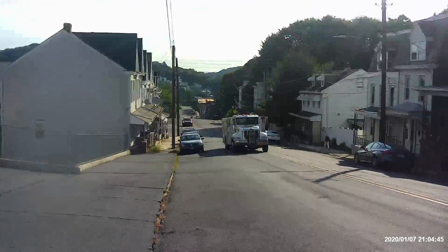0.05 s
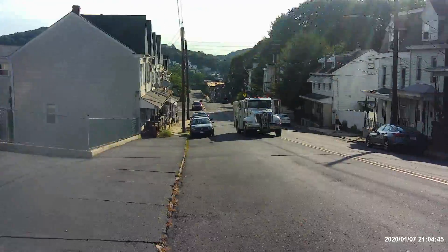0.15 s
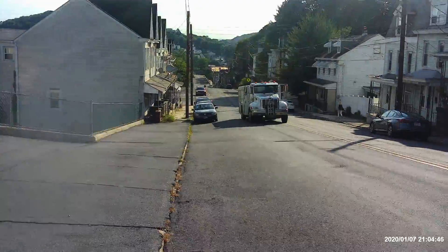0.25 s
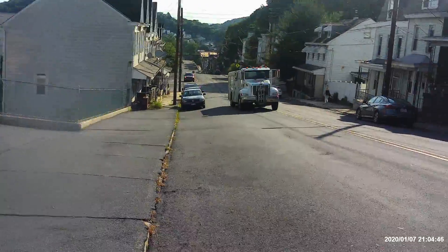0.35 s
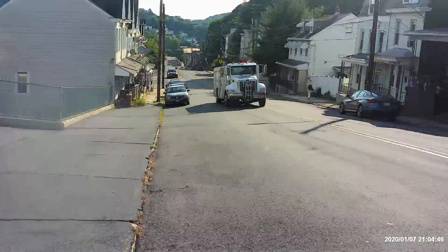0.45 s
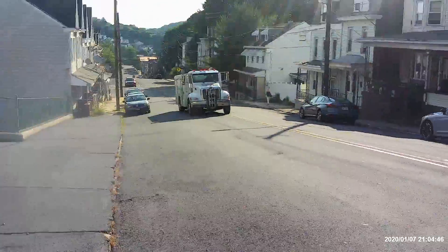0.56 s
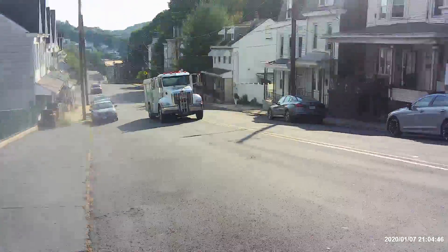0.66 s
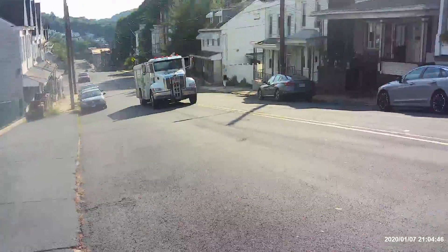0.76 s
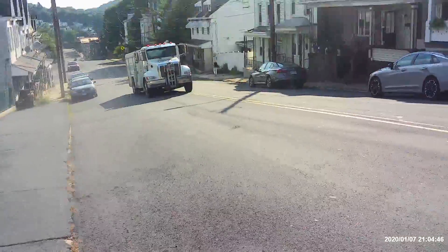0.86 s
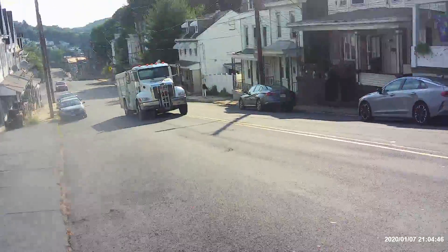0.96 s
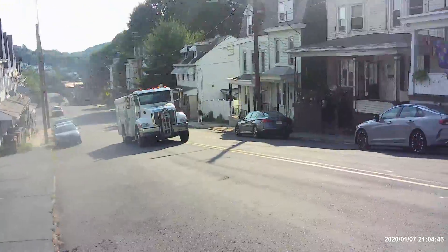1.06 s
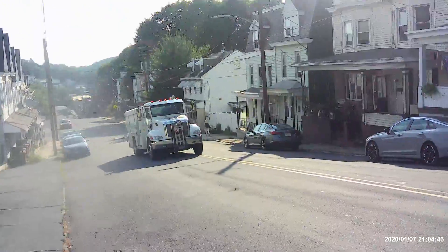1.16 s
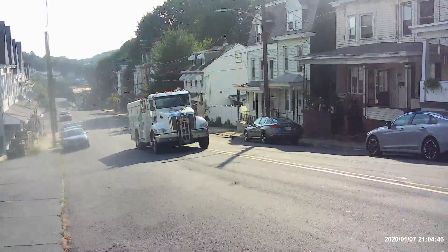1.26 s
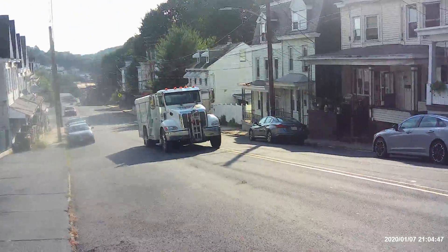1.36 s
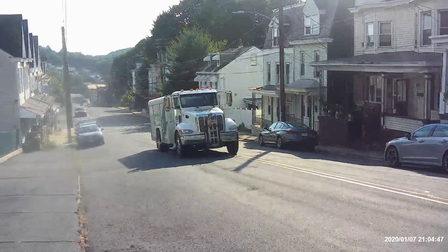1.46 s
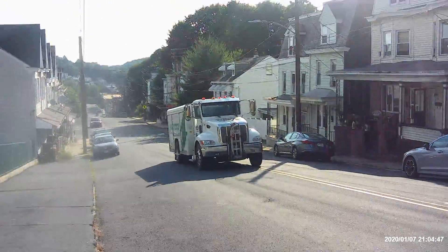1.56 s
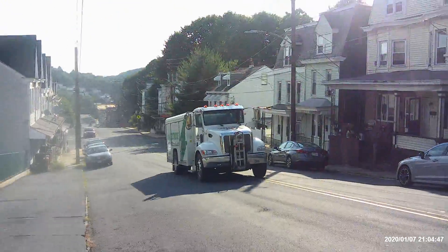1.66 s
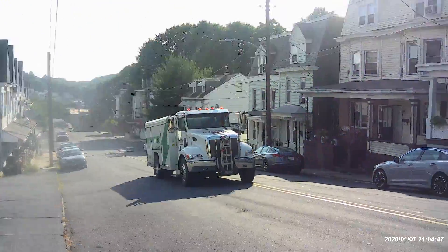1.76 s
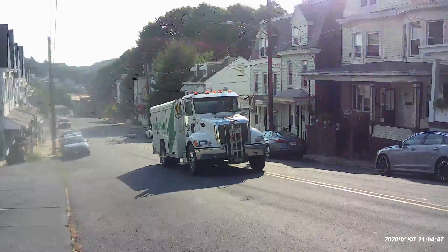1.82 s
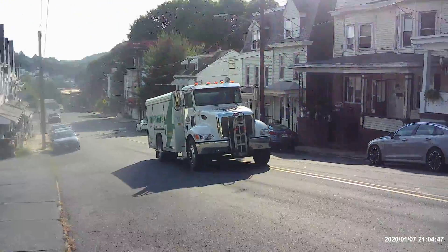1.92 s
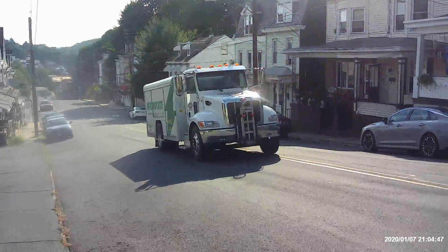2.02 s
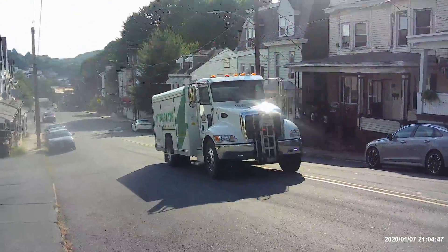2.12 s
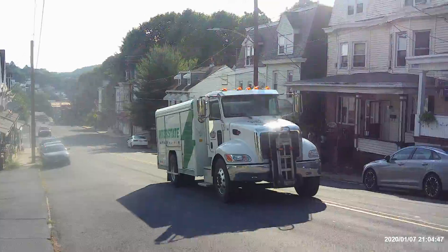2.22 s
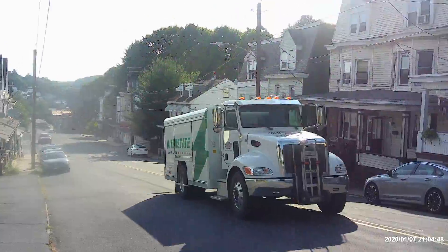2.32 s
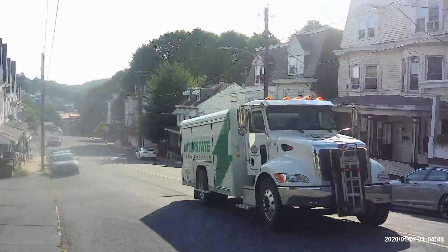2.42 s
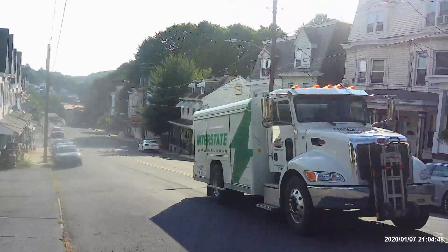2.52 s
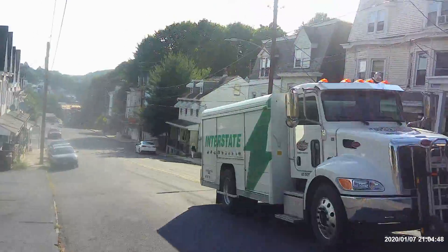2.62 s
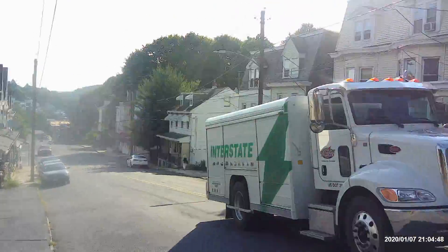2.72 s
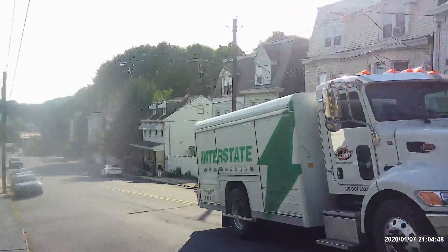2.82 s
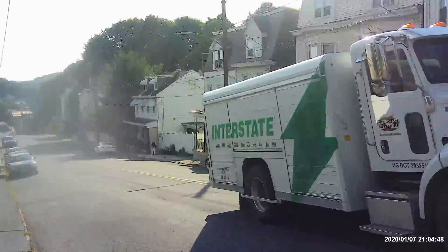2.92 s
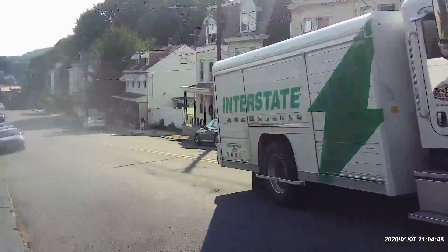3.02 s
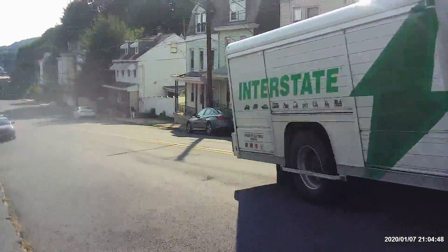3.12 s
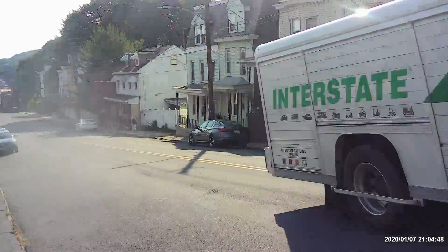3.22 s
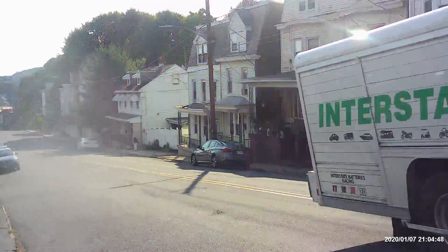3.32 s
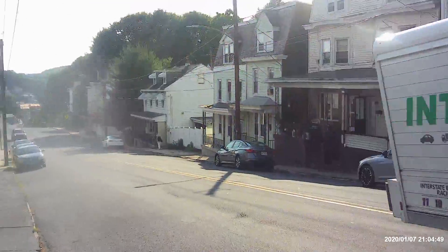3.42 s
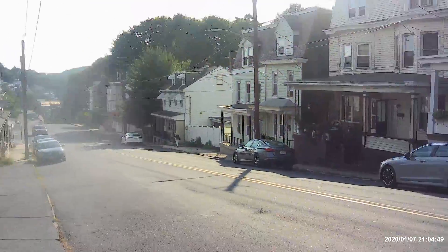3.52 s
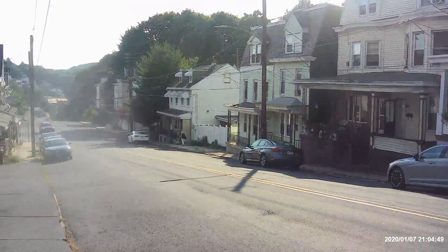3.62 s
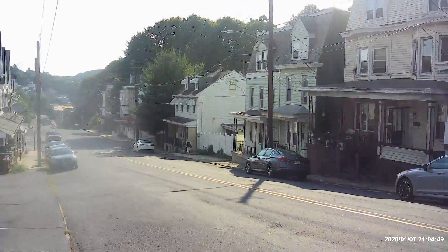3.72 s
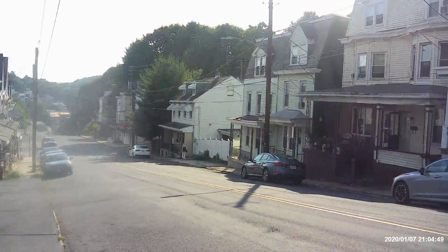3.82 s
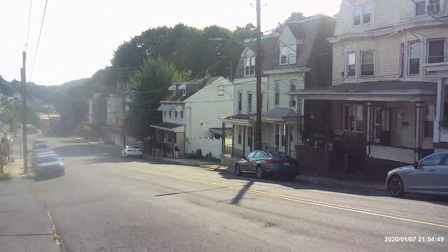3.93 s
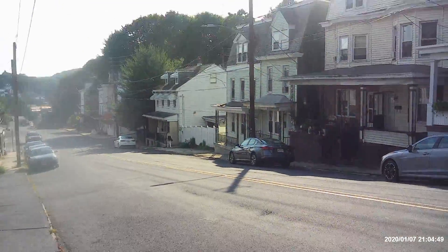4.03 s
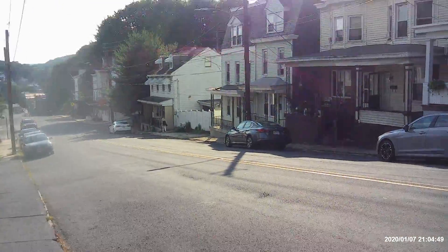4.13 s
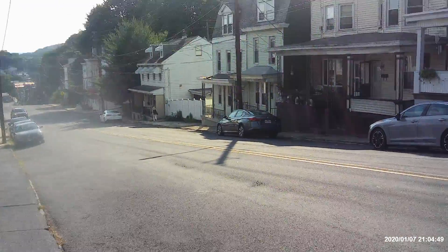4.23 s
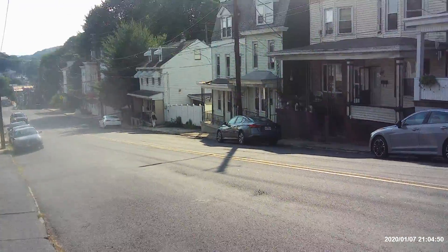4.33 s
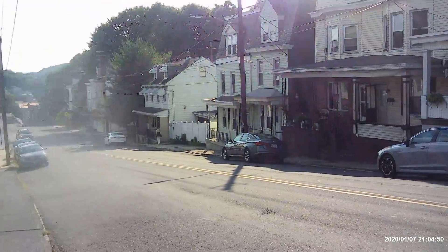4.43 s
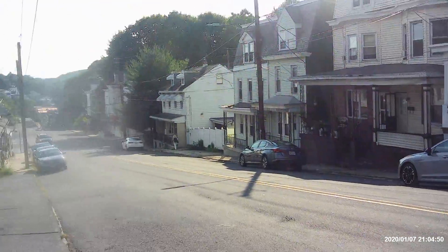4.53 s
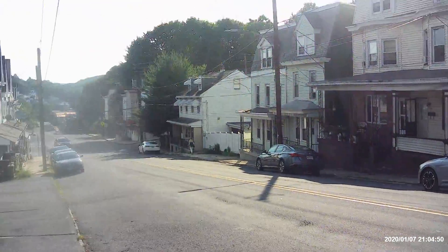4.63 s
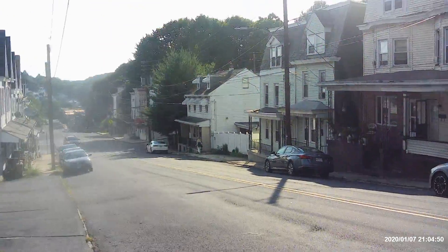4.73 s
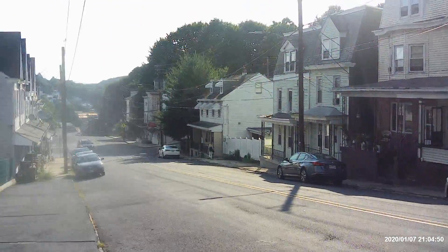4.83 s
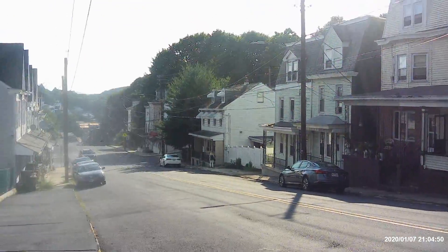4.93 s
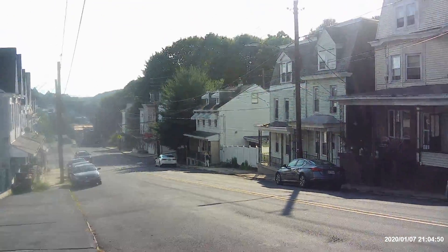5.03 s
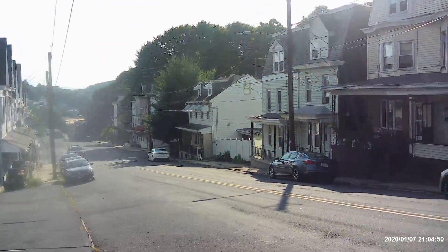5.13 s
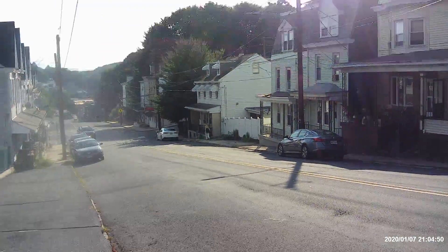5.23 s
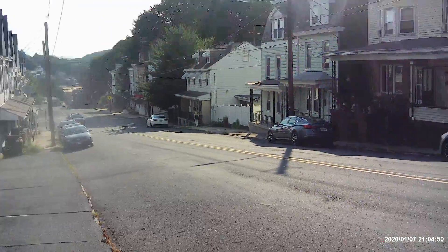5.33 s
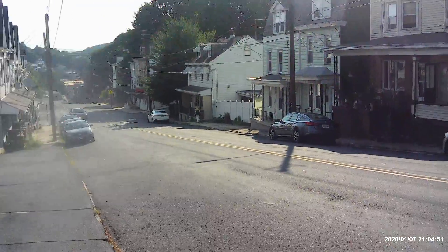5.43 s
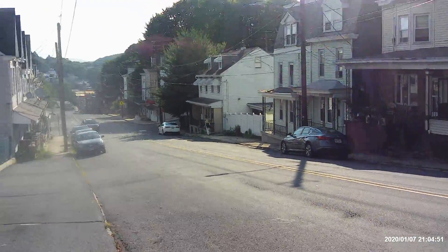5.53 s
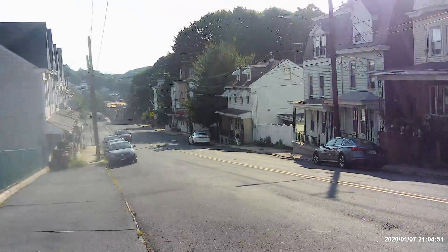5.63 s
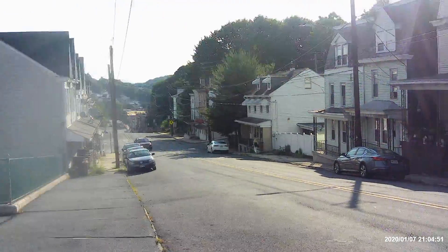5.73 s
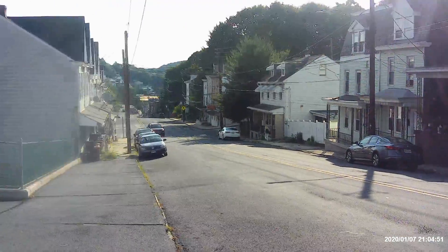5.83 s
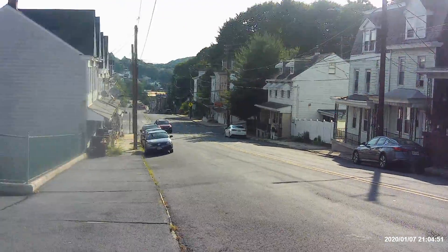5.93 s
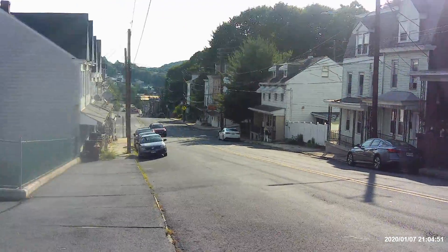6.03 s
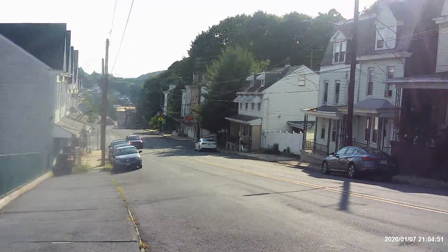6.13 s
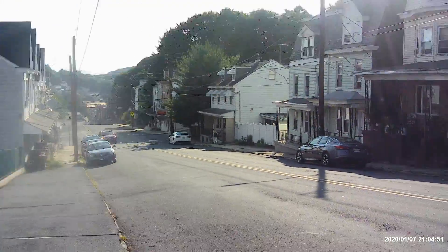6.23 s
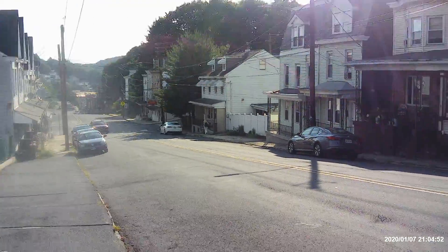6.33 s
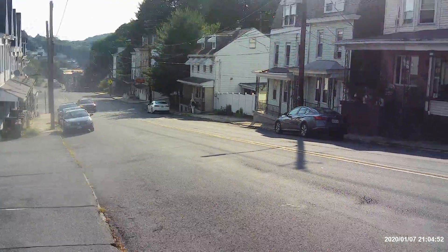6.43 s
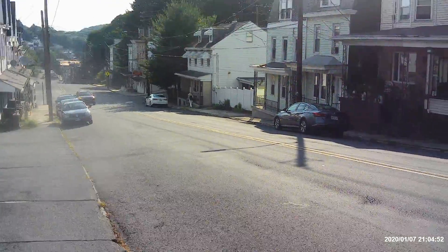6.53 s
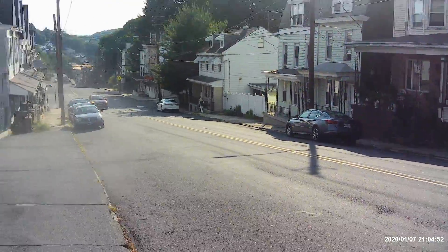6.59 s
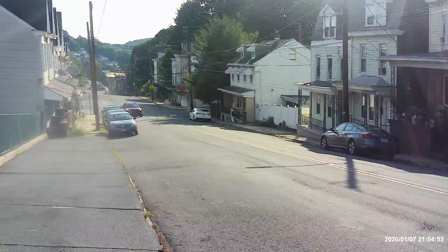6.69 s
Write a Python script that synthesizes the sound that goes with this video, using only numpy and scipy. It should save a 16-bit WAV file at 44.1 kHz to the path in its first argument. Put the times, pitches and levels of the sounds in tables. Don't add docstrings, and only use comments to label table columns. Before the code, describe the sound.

A roadside microphone on a residential street hears one heavy six-cylinder diesel truck. From 0 to 1.5 seconds it is at moderate distance: a buzzing low drone with soft broadband roar and mid-range clatter, its tones swelling and dipping as echoes off house fronts interfere. A faint, fuzzy gear whine flickers through. From 1.5 to 3 seconds it grows steadily, engine notes stronger and more nasal, clatter brightest around 3.1. Between 3.3 and 4 it passes: tyre and exhaust roar peaks near 3.8, with a short thump-like surge at 3.7, while the pitch slides down slightly. A very high, thin turbo whistle appears in bursts, most sustained from 3.3 to 4.5. Another small wheel bump comes at 4.2. Then clatter drops behind a duller tail rumble, which fades quickly by 5 seconds and dwindles to a faint, wavering hum by 6.8. Treble is thin and patchy.

```python
import sys
import numpy as np
from scipy import signal
from scipy.io import wavfile
from scipy.ndimage import uniform_filter1d

SR = 44100
rng = np.random.default_rng(int(sys.argv[2]) if len(sys.argv) > 2 else 0)


def to_wav(s):
    ch = np.atleast_2d(s).T
    pcm = np.round(np.clip(ch, -1, 1) * 32767)
    wavfile.write(sys.argv[1], SR, pcm.astype(np.int16))


def natural_amplitude(level_db):
    exponent = np.asarray(level_db, float) / 20
    return 10 ** exponent


N = 298116


def evened(x):
    return x / np.sqrt(np.mean(x ** 2) + 1e-20)


def bump(t, centre_s, width_s):
    return np.exp(-.5 * ((t - centre_s) / width_s) ** 2)


def drift(per_s):
    steps = int(N / SR * per_s) + 3
    z = rng.standard_normal((steps, 2)) @ [1, 1j]
    smooth = signal.resample(z, 50 * steps)
    return smooth[(np.arange(N) / SR * per_s * 50).astype(int)] / np.sqrt(2)


def blend(values, facing):
    return sum(np.maximum(1 - abs(facing - k), 0) * v for k, v in enumerate(values))


def doppler(t, abreast_s, glide_s, share):
    return 1 - share * (t - abreast_s) / np.hypot(t - abreast_s, glide_s)


# time in seconds, roar level in dB, facing side (0 far ahead, 1 near ahead, 2 flank, 3 tail).
PASSING = [(0.0, -33.5, 0.5), (.55, -32, 0), (1.0, -30, 0.3), (1.5, -29, 1.03), (2.05, -26.5, 1.15),
           (2.45, -24, 0.84), (2.85, -24, 1), (3.15, -22.5, 1.04), (3.55, -19, 1.57), (3.8, -17.5, 2),
           (3.97, -20.5, 2.5), (4.25, -24.5, 3), (4.6, -28.5, 6), (5.0, -31.5, 5), (6.4, -39, 3),
           (6.76, -42, 3)]


def passing(t):
    s, near_db, facing = np.transpose(PASSING)
    return np.interp(t, s, near_db), np.clip(np.interp(t, s, facing), 0, 3)


def body_screening(t):
    nose, shade = (3.1, .27, 4.5, 2, 1), (3.92, .3, -4.5, -2, -1)
    return sum(bump(t, s, width) * np.array(db)[:, None] for s, width, *db in (nose, shade))


# time in seconds, extra roar in dB, extra clatter in dB.
SEAMS = [
    (3.67, 3.5, 2),
    (3.8, 0.5, -2),
    (4.2, 2.5, 1.5),
    (4.245, 0.5, 0.5),
]


def seam_surges(t):
    return sum(bump(t, s, .022) * np.array(db)[:, None] for s, *db in SEAMS)


def engine_cycle(t):
    cycle_hz = 16.669 + .507 * t
    return np.cumsum(cycle_hz * doppler(t, abreast_s=3.49, glide_s=.786, share=.046)) / SR


def echoed(dips, t):
    s, echo, top_db = np.transpose(dips)
    ends = np.append(s, 2 * s[-1] - s[-2])
    slip = np.interp(t, ends, np.arange(len(ends)))
    echo = np.clip(np.interp(t, s, echo), 0, 1)
    swell = natural_amplitude(np.interp(t, (ends[1:] + s) / 2, top_db))
    interference = abs(1 - echo * np.exp(2j * np.pi * slip)) / (1 + echo)
    return swell * interference ** .9


# time of the dip in seconds, echo share 0-1, top of the next swell in dB.
ORDER_6_DIPS = [(-.2, .5, -29), (1.17, .9, -30), (2.05, .5, -30), (2.42, .3, -31.5), (2.88, .45, -34),
                (3.07, .35, -28.5), (3.56, .5, -29), (4.25, .15, -32.5), (4.62, .35, -38.5),
                (4.88, .5, -37), (5.6, .9, -43.5), (6.04, .35, -46), (6.57, .8, -57.5)]
ORDER_9_DIPS = [(-.2, .5, -54), (1.0, .5, -46), (1.77, .6, -40), (2.62, .8, -43), (3.11, .5, -31),
                (3.71, .6, -30.5), (4.02, .25, -39), (4.44, .45, -41), (4.8, .15, -38), (5.39, .5, -41),
                (6.05, .3, -45), (6.27, .5, -42), (6.65, .3, -50)]
ORDER_12_DIPS = [(-.2, .3, -44), (.84, .5, -36), (1.52, 1, -37.5), (2.1, .6, -30.5), (2.65, 0.28, -30.5),
                 (3.05, 0.33, -29), (3.37, 0.27, -25), (3.67, .8, -30.5), (4.2, 0.55, -37), (4.9, .9, -45),
                 (5.41, .8, -43.5), (5.78, .6, -48.5), (6.44, .9, -50)]
ORDER_15_DIPS = [(-.3, .2, -34), (.61, .6, -30), (1.15, .4, -28), (1.53, .8, -42), (1.69, .8, -31.5),
                 (2.03, .6, -31.5), (2.3, .3, -31), (2.63, .4, -25), (2.9, .1, -23.5), (3.45, .5, -33),
                 (3.71, .7, -36), (4.11, .8, -42), (4.55, .5, -45), (5.08, .6, -46), (5.7, .8, -47),
                 (6.4, .8, -51)]
# order of the cycle, levels in dB over the roar from far ahead, near ahead, flank and tail.
WEAK_ORDERS = [(3, -39, -42, -48, -37), (4, -29, -30, -34, -27), (5, -29, -30, -32, -24),
               (7, -22, -22, -22, -20), (8, -18, -20, -22, -22), (10, -22, -22, -20, -18),
               (11, -12, -10, -16, -16), (13, -15, -14, -17, -17), (14, -16, -8, -14, -17),
               (16, -12, -11, -16, -19), (17, -12, -16, -18, -18), (18, -16, -13, -14, -20),
               (19, -16, -18, -20, -20), (20, -14, -13, -14, -16), (21, -18, -16, -16, -18),
               (22, -16, -9, -18, -22), (24, -9, -10, -14, -18), (26, -5, -5, -14, -26),
               (27, -20, -14, -22, -26), (39, -10, -20, -30, -30), (41, -14, -22, -30, -30),
               (42, -9, -20, -30, -30), (45, -17, -26, -34, -34), (48, -17, -26, -34, -34)]


def engine(t, roar_db, facing, cycle):
    out = np.zeros(N)
    strong = {6: ORDER_6_DIPS, 9: ORDER_9_DIPS, 12: ORDER_12_DIPS, 15: ORDER_15_DIPS}
    for order, dips in strong.items():
        wander = np.exp(.045j * order * drift(per_s=6).real)
        tone = (wander * np.exp(2j * np.pi * order * cycle)).real
        out += np.sqrt(2) * echoed(dips, t) * tone
    for order, *side_db in WEAK_ORDERS:
        fading = .7 + .7 * drift(per_s=3 + order / 3)
        turn = np.exp(2j * np.pi * (order * cycle + 0.28 * rng.standard_normal()))
        out += natural_amplitude(roar_db + 1.0 + blend(side_db, facing)) * (fading * turn).real
    return out


def read(points, hz):
    f, db = np.transpose(points)
    return np.interp(np.log(hz + 1), np.log(f + 1), db, left=-200, right=-200)


def rush(colours, level_db, facing, patchy_db, size=1024):
    hop = size // 4
    frames, hz = N // hop + 5, np.fft.rfftfreq(size, 1 / SR)
    a, b, patches = rng.standard_normal((3, len(hz), frames))
    patches = uniform_filter1d(patches, size=6, axis=0)
    patches = evened(uniform_filter1d(patches, size=16, axis=1))
    side = facing[np.minimum(np.arange(frames) * hop, N - 1)]
    shape = natural_amplitude(blend([read(c, hz)[:, None] for c in colours], side))
    shape = shape / np.sqrt((shape ** 2).mean(0))
    z = (a + 1j * b) * shape * natural_amplitude(patchy_db * patches)
    noise = signal.istft(z, nperseg=size, noverlap=size - hop)[1][:N]
    return natural_amplitude(level_db) * evened(noise)


def knock(cycle, depth):
    firing = 6 * cycle
    strength = 1 + .5 * rng.standard_normal(6)[firing.astype(int) % 6]
    return evened(1 + depth * strength * np.sin(np.pi * firing) ** 2)


# frequency in Hz, level in dB per Hz.
ROAR_COLOURS = [
    [(35, -59), (60, -40), (95, -24), (140, -11), (330, -8.5), (460, -7.5), (600, -12.5), (760, -7), (950, -7.5), (1200, -27), (1560, -38), (2640, -120)],
    [(35, -63.5), (60, -43.5), (95, -12), (140, -12), (330, -7.5), (470, -2), (620, -6), (800, -5), (950, -6), (1200, -22.5), (1560, -39.5), (2640, -120)],
    [(35, -64), (60, -31), (102, -33), (134, -9.5), (158, -23), (263, -8), (365, -7.5), (700, -0.5), (1200, -28), (1560, -50), (2640, -120)],
    [(35, -60), (60, -29), (95, -18), (140, -10.5), (300, -7.5), (500, -3), (680, 1), (880, -4), (1060, -26.5), (1200, -25), (1560, -51), (2640, -120)],
]


def roar(roar_db, facing, cycle):
    return rush(ROAR_COLOURS, roar_db, facing, patchy_db=0.32, size=2048) * knock(cycle, depth=0.23)


# frequency in Hz, level in dB per Hz.
CLATTER_COLOURS = [
    [(620, -30), (1050, -4), (1120, -9), (1220, -3), (1320, 4), (1430, -1.5), (1690, 2), (2010, -6.5), (2620, 0), (3160, -15.5), (3570, -11.5), (4600, -22.5), (5980, -51.5), (10100, -120)],
    [(620, -16.5), (1050, -5.5), (1170, -3.5), (1500, 1.5), (1700, 2), (1940, -6.5), (2050, -7.5), (2370, -5.5), (2650, -4.5), (3140, -10), (4020, -14), (4600, -23.5), (5980, -53), (10100, -120)],
    [(620, -27), (1050, -9.5), (1300, -8), (1750, 3.5), (2150, -5.5), (2570, -1), (3020, -10.5), (3420, -3.5), (3940, -10), (4600, -29), (5980, -59), (10100, -120)],
    [(620, -43), (1050, -16.5), (1290, -2), (1650, -0.5), (1850, -3), (2140, -15.5), (2390, -9), (2590, -8), (2930, -14), (3320, -13.5), (3870, -14.5), (4320, -24.5), (4600, -47), (5980, -53), (10100, -120)],
]


def clatter(clatter_db, facing, cycle):
    return rush(CLATTER_COLOURS, clatter_db, facing, patchy_db=0.64) * knock(cycle, depth=0.073)


# frequency in Hz, level in dB per Hz.
HISS_COLOURS = [
    [(2590, -32), (4400, 0.5), (4770, -2), (5420, -4.5), (5850, -10.5), (6510, -6), (7300, -14.5), (7960, -10), (8400, -19.5), (10900, -42), (18500, -120)],
    [(2590, -28), (4400, -7), (4880, -0.5), (5800, -10), (6020, -10), (6570, -4), (7260, -12), (7910, -6.5), (8400, -15), (10900, -41), (18500, -120)],
    [(2590, -27), (4400, -2), (4940, -2.5), (6640, 5), (7360, -6.5), (7960, -4.5), (8400, -10.5), (10900, -36), (18500, -120)],
    [(2590, -17), (4400, -0.5), (4660, 2.5), (5110, -3), (5430, -0.5), (5960, 0.5), (7300, -7.5), (7870, -6.5), (8400, -17.5), (10900, -39), (18500, -120)],
]
# frequency in Hz, level in dB per Hz.
TOP_COLOUR = [(8000, -30), (8400, -1), (9000, -6.5), (9700, -1), (10500, 1.5), (10700, -38)]


def hiss(hiss_db, facing):
    body = rush(HISS_COLOURS, hiss_db, facing, patchy_db=1.0)
    top = rush([TOP_COLOUR] * 4, 0.52 * hiss_db - 40, facing, patchy_db=2.0)
    return body + top


def whistle(hz, db, width_hz):
    pole = np.exp(-np.pi * width_hz / SR)
    noise = rng.standard_normal((N, 2)) @ [1, 1j]
    fuzz = signal.lfilter([1], [1, -2 * pole, pole ** 2], noise)
    return natural_amplitude(db) * evened((fuzz * np.exp(2j * np.pi * np.cumsum(hz) / SR)).real)


def boosted_pitch(t, full_hz, climb_hz_per_s):
    lag = np.minimum(t - 2.75, 0)
    return (full_hz + climb_hz_per_s * lag) * doppler(t, abreast_s=3.3, glide_s=.25, share=.026)


# centre in seconds, width in seconds, change of level in dB.
WHINE_GAPS = [
    (.62, 0.074, 10),
    (1.15, 0.11, 13),
    (1.88, 0.036, -2),
    (2.65, 0.082, 5),
    (2.9, 0.054, 9),
    (3.1, 0.08, 3.5),
    (3.46, 0.065, 9),
    (4.4, 0.12, 2),
]


def gear_whine(t, db):
    db = db - 3 * np.maximum(t - 3.9, 0)
    db = db + 2.5 * drift(per_s=7).real
    db = db + sum(gain_db * bump(t, s, width) for s, width, gain_db in WHINE_GAPS)
    return whistle(boosted_pitch(t, 2615, 52), db, width_hz=320)


# start in seconds, length in seconds.
TURBO_BURSTS = [(1.58, .045), (1.645, .045), (1.8, .05), (2.25, .05), (2.32, .04), (2.57, .05), (2.64, .05),
                (2.8, .07), (3.31, .27), (3.66, .17), (3.86, .58), (4.47, .15), (4.66, .1), (4.78, .11),
                (5.29, .05), (5.36, .045), (5.77, .06), (6.14, .07), (6.31, .06)]


def turbocharger(t, db):
    heard = sum((t > s) & (t < s + length) for s, length in TURBO_BURSTS) * 1.
    heard = uniform_filter1d(heard, size=600)
    return heard * whistle(boosted_pitch(t, 11510, 400), db, width_hz=300)


def scene():
    t = np.arange(N) / SR
    near_db, facing = passing(t)
    seen_clatter_db, seen_hiss_db, seen_whine_db = body_screening(t)
    surge_roar_db, surge_clatter_db = seam_surges(t)
    roar_db = near_db + surge_roar_db
    clatter_db = near_db - 4.5 + seen_clatter_db + surge_clatter_db
    hiss_db = near_db - 24 + seen_hiss_db
    whine_db = clatter_db - 14.5 + seen_whine_db
    cycle = engine_cycle(t)
    mix = engine(t, roar_db, facing, cycle)
    mix += roar(roar_db, facing, cycle) + clatter(clatter_db, facing, cycle) + hiss(hiss_db, facing)
    mix += gear_whine(t, whine_db) + turbocharger(t, hiss_db - 15)
    return mix[None]


# start in seconds, all kept below in Hz, patches kept below in Hz,
# share of patches kept 0-1.
TREBLE_KEPT = [
    (0, 8400, 10000, .35),
    (.8, 8500, 9450, .57),
    (1.16, 8550, 9700, .08),
    (2.0, 8550, 10000, .25),
    (2.28, 8550, 9800, .08),
    (2.86, 8550, 9600, .35),
    (3.08, 8300, 10000, .55),
    (4.48, 8100, 9500, .5),
    (4.75, 8000, 10000, .55),
    (5.6, 8000, 10500, .55),
]


def treble_gate(dry):
    hz, t, z = signal.stft(dry[0], SR, "cosine", nperseg=2048, noverlap=1024)
    start, *habit = np.transpose(TREBLE_KEPT)
    full_hz, patchy_hz, share = np.array(habit)[:, np.searchsorted(start, t, "right") - 1]
    band = np.arange(len(hz)) // 5
    held = np.arange(len(t)) // 2 * 2
    chance = rng.random((len(hz), len(t)))[band][:, held]
    f = hz[5 * band, None]
    kept = (f < full_hz) | (f < patchy_hz) & (chance < share)
    kept &= ~((abs(f - 7350) < 150) & (chance < .45))
    top = uniform_filter1d(abs(z), size=5, axis=0) * (f > 10700)
    kept |= top > np.maximum(natural_amplitude(-92), natural_amplitude(-8) * top.max(0))
    return signal.istft(z * kept, SR, "cosine", nperseg=2048, noverlap=1024)[1][None, :N]


def top_cut(x):
    return signal.sosfilt(signal.butter(12, 11950, fs=SR, output="sos"), x)


def record(dry):
    thinned = treble_gate(dry)
    return top_cut(thinned)


dry = scene()
out = record(dry)
to_wav(out)
```